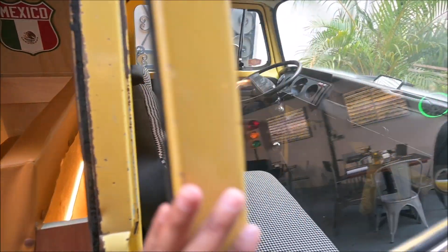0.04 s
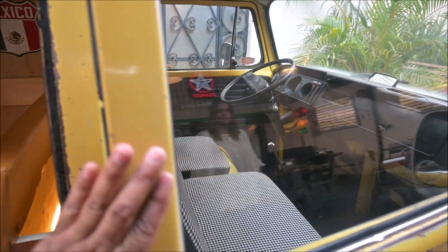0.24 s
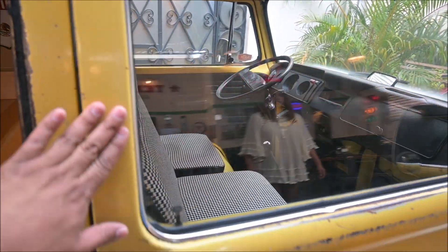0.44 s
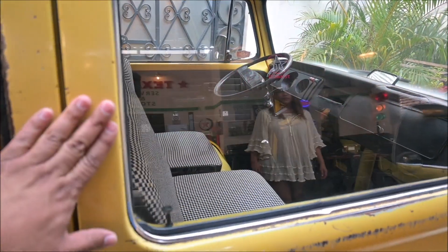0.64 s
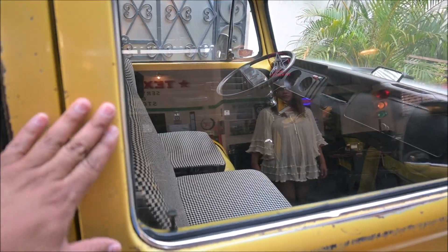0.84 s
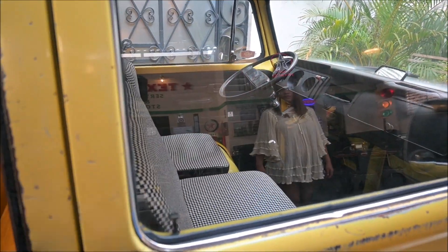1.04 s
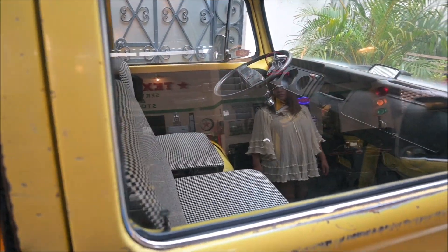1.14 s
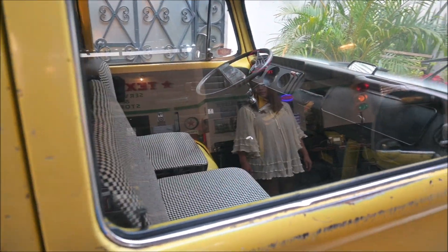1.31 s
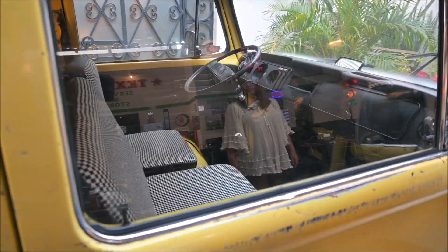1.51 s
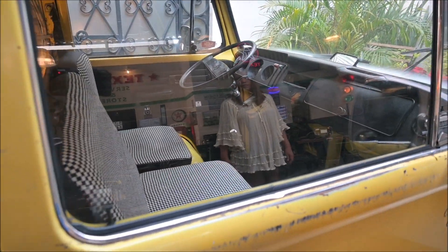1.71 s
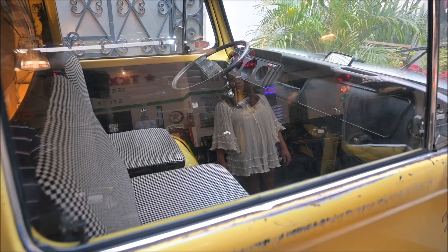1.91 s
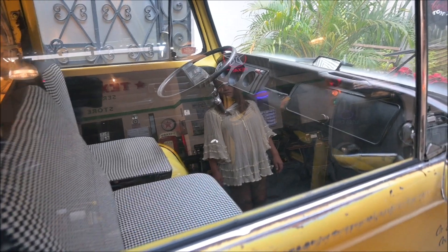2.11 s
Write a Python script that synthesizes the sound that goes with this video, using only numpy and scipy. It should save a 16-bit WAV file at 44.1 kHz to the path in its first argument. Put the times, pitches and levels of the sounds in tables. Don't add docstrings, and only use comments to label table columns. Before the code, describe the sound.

A van door slams once, heard close in a large hard-walled hall. Low, patchy room hum starts alone; from about 0.35 seconds the edge softly brushes the rubber seal. At 0.52 the latch cracks and chatters, and the thin metal panel lands with a hollow boom until about 0.7. The echo fades over the next second, leaving distant drones, faint hiss and a barely audible airy whistle near 1.4.

```python
import sys
import numpy as np
from scipy import signal
from scipy.io import wavfile

SR = 44100
rng = np.random.default_rng(int(sys.argv[2]) if len(sys.argv) > 2 else 0)


def volts_from_db(level):
    exponent = np.asarray(level, float) / 20
    return 10 ** exponent


def generate_wav(signal):
    frames = np.transpose(np.atleast_2d(signal))
    scaled = np.clip(frames, -1, 1) * 32767
    pcm = np.round(scaled).astype(np.int16)
    wavfile.write(sys.argv[1], SR, pcm)


N = 95079

# start in seconds, level in dB, chatter length in seconds.
LATCH_CONTACTS = [
    (.5152, -13.5, 0.0051),
    (.5235, -20, .007),
    (.5325, -20, 0.0069),
    (.520, -24.5, 0.089),
    (.549, -35, 0.012),
    (.564, -26, 0.0037),
    (.576, -30, 0.0094),
    (.587, -26, 0.013),
]
# pitch in Hz, level in dB, 60 dB decay time in seconds.
LATCH_MODES = [(1346, -9.5, 0.021), (1530, -10, .03), (2030, -8.5, 0.038), (2366, -0.5, 0.01),
               (2644, -5, 0.019), (2910, -2.5, 0.02), (3103, -1, 0.015), (3260, -9, 0.018),
               (3386, 0.5, 0.0083), (3600, -2, 0.0075), (4320, 0, 0.0042), (5650, -4, 0.0059),
               (7106, -24.5, .01), (7967, -20, .01)]
# start in seconds, level in dB, length in seconds.
PLATE_STRIKES = [
    (.5155, -18, 0.0069),
    (.5184, -19.5, 0.0046),
    (.534, -19, 0.0034),
]
# start in seconds, level in dB, length in seconds.
PANEL_LANDINGS = [
    (.517, -21.5, 0.0063),
    (.530, -13, 0.017),
    (.542, -13.5, 0.031),
    (.575, -15.5, 0.029),
    (.592, -17.5, 0.024),
    (.612, -14.5, 0.021),
    (.640, -16, 0.045),
]
# pitch in Hz, level in dB, 60 dB decay time in seconds.
PANEL_MODES = [(156, -11.5, 0.094), (197.4, -7, 0.072), (221.5, -0.5, 0.23), (271, -2.5, 0.26),
               (347.3, -2.5, 0.11), (412.6, -8, 0.25), (519, -14, 0.04), (637.4, -6.5, .1),
               (715, 4.5, 0.17), (816, -7.5, 0.11), (797, -24, 0.12), (923, -10, 0.093), (1123, -8, 0.1),
               (1202, -27, .08)]
# start in seconds, level in dB.
SEATING_PUSHES = [
    (0.546, -38.5),
    (.579, -37),
    (.597, -32),
    (.618, -31),
    (.647, -39),
]
# pitch in Hz, level in dB, 60 dB decay time in seconds.
HOLLOW_MODES = [(160.4, -5.5, 0.48), (206.6, -9, 0.22), (233.4, 0.5, 0.24), (272.2, -0.5, 0.6),
                (333.2, -4, 0.34), (722, 7, 0.088)]
# start in seconds, level in dB, length in seconds, centre in Hz.
SCUFFS = [
    (.418, -62.5, 0.0062, 4000),
    (.454, -64, .009, 3600),
    (.497, -54.5, 0.0072, 3000),
    (.503, -39.5, .010, 1850),
    (0.504, -55.5, .008, 6200),
    (.903, -67, 0.0084, 11000),
]
# time in seconds, level in dB.
BRUSH_LEVEL = [
    (.33, -70.5),
    (.385, -65.5),
    (.43, -60),
    (.46, -63),
    (.50, -61),
    (.52, -50),
    (.56, -82),
]
# frequency in Hz, 60 dB decay time in seconds.
HALL_DECAY = [(60, 0.71), (170, 0.18), (350, 1.62), (700, 0.9), (1500, 0.8), (3000, 0.66), (6000, 0.54),
              (12000, 0.39)]
# time in seconds, level in dB.
TONE_BEFORE = [
    [(0.0, -51.5), (0.07, -54.5), (0.236, -52.5), (0.48, -49.5)],
]
# time in seconds, level in dB.
TONE_AFTER = [
    [(1.25, -47.5), (1.342, -49), (1.68, -53.5), (1.702, -48.5), (1.732, -51), (2.15, -47.5)],
]
# frequency in Hz, level in dB per Hz.
TONE_SPECTRUM = [(18, -51.5), (30, -22.5), (87, -6.5), (234, -6), (272, -4.5), (409, -4.5), (883, -7.5),
                 (1830, -28), (5000, -43.5), (6500, -68), (11000, -120)]
# centre in Hz, width in Hz, level in dB.
DRONE_BANDS = [
    (98.6, 15, -62.5),
    (226.6, 42, -61),
    (416.4, 36, -62.5),
]
# start in seconds, level in dB, length in seconds.
WHISTLE_SWELL = [
    (1.31, -71, 0.35),
]

CHATTER_PER_S, CHATTER_SPREAD_DB = 6000, 3


def in_time(rows):
    s, db = np.transpose(rows)
    return np.interp(np.arange(N) / SR, s, db)


def at_hz(points, hz):
    point_hz, value = np.transpose(points)
    return np.interp(np.log(hz), np.log(point_hz), value)


def rms_one(x):
    return x / np.sqrt(np.mean(x ** 2) + 1e-20)


def band(x, low_hz, high_hz):
    edges = [low_hz, min(high_hz, .45 * SR)]
    return signal.sosfilt(signal.butter(2, edges, "band", fs=SR, output="sos"), x)


def noise_band(low_hz, high_hz):
    return rms_one(band(rng.standard_normal(N), low_hz, high_hz))


def drift(rate):
    pole = np.exp(-80 * np.pi * rate / SR)
    white = rng.standard_normal(N // 40 + 2002)
    slow = signal.lfilter([1], [1, -2 * pole, pole * pole], white)[2000:]
    return np.interp(np.arange(N) / 40, np.arange(len(slow)), rms_one(slow))


def ring(force, hz, t60):
    decay = volts_from_db(-60 / (max(t60, .003) * SR))
    w = 2 * np.pi * hz / SR
    return signal.lfilter([0, np.sin(w)], [1, -2 * decay * np.cos(w), decay * decay], force + 1e-18)


def bursts(hits):
    t = np.arange(N) / SR
    out = 0
    for s, db, length in hits:
        u = np.maximum(t - s, 0) / length
        out = out + volts_from_db(db) * (1 - np.exp(-u * 2.9)) * np.exp(-u * u)
    return out


def clicks(per_s):
    size = volts_from_db(CHATTER_SPREAD_DB * np.minimum(rng.exponential(1, N), 4))
    size = size * rng.choice([-1, 1], N)
    return rms_one(size * (rng.random(N) < per_s / SR))


def struck(force, modes, shared):
    out = 0
    for hz, db, t60 in modes:
        own = force * rng.standard_normal(N) * .7
        out = out + volts_from_db(db) * ring(shared + own, hz, t60)
    return out


def latch():
    force = bursts(LATCH_CONTACTS)
    contacts = force * clicks(CHATTER_PER_S)
    crack = band(contacts + force * rng.standard_normal(N), 487, 5860)
    return volts_from_db(-25.5) * struck(force, LATCH_MODES, contacts) + volts_from_db(-1.5) * crack


def strike():
    centre_hz, width_hz = 3130, 940
    plate = band(clicks(CHATTER_PER_S), centre_hz - width_hz / 2, centre_hz + width_hz / 2)
    return bursts(PLATE_STRIKES) * rms_one(plate)


def panel():
    force = bursts(PANEL_LANDINGS)
    skin = struck(force, PANEL_MODES, force * clicks(1200))
    thud = band(force * rng.standard_normal(N), 142, 1390)
    return volts_from_db(-44.5) * skin + volts_from_db(6) * thud


def boom():
    push = np.zeros(N)
    for s, db in SEATING_PUSHES:
        push[int(s * SR)] = volts_from_db(db)
    hollow = sum(volts_from_db(db) * ring(push, hz, t60) for hz, db, t60 in HOLLOW_MODES)
    return hollow + volts_from_db(33.5) * band(push, 158, 880)


def seal():
    scuffs = 0
    for s, db, length, hz in SCUFFS:
        side_hz = .14 * hz
        scuffs = scuffs + bursts([(s, db, length)]) * noise_band(hz - side_hz, hz + side_hz)
    rubbing = rms_one(band(clicks(2980), 696, 2300))
    return scuffs + rubbing * volts_from_db(in_time(BRUSH_LEVEL) + 3.7 * drift(30))


def puff():
    return bursts([(.53, -49.5, .14)]) * noise_band(36, 75)


def hall(x):
    level_db, build_s = -9.5, .02
    t = np.arange(int(1.6 * SR)) / SR
    edges = 45 * 2 ** np.arange(0, 8.8, .3)
    white = rng.standard_normal((2, len(t)))
    echo = 0
    for k, (low, high) in enumerate(zip(edges, edges[1:])):
        t60 = at_hz(HALL_DECAY, np.sqrt(low * high))
        echo = echo + band(white[k % 2], low, high) * volts_from_db(-60 * t / t60)
    echo = echo * (1 - np.exp(-t / build_s))
    return volts_from_db(level_db) * signal.fftconvolve(x, echo / np.sqrt(np.sum(echo ** 2)))[:N]


def room_tone():
    patchy_db = 2.0
    together = drift(3)
    edges = 25 * 2 ** np.arange(0, 8, 1 / 3)
    white = rng.standard_normal((2, N + 4000))
    out = 0
    for k, (low, high) in enumerate(zip(edges, edges[1:])):
        gain_db = at_hz(TONE_SPECTRUM, np.sqrt(low * high))
        gain_db = gain_db + patchy_db * (0.2 * together + drift(27.0))
        out = out + band(white[k % 2], low, high)[4000:] * volts_from_db(gain_db)
    return rms_one(out) * volts_from_db(0.5 + in_time(TONE_BEFORE[0] + TONE_AFTER[0]))


def drones():
    out = 0
    for hz, width, db in DRONE_BANDS:
        level = volts_from_db(db + 2.33 * drift(2.9))
        out = out + level * noise_band(hz - width / 2, hz + width / 2)
    return out


def whistle():
    centre_hz = 3360
    return bursts(WHISTLE_SWELL) * noise_band(centre_hz - 260, centre_hz + 260)


def hiss():
    mid_db, side_db, tilt = -69, -69, 0.067
    white = signal.lfilter([1, -tilt], [1], rng.standard_normal((2, N)))
    mid, side = band(white, 1500, 19160)
    return volts_from_db(mid_db) * mid + volts_from_db(side_db) * side * [[1], [-1]]


def scene():
    port_db, hall_wide_db = -18, -14
    door = latch() + strike() + panel() + boom() + seal()
    echo = hall(door)
    sideways = band(volts_from_db(port_db) * door + volts_from_db(hall_wide_db) * echo, 4000, 12000)
    wide = np.gradient(sideways) * [[1], [-1]]
    return door + echo + wide + puff() + room_tone() + drones() + whistle() + hiss()


def band_limit(x):
    return signal.sosfilt(signal.butter(12, 16660, fs=SR, output="sos"), x)


def record(dry):
    ceiling, cutoff_hz = .28, 15780
    mid = dry.mean(axis=0)
    limited = dry - mid + ceiling * np.tanh(mid / ceiling)
    top_cut = signal.ellip(12, .5, 60, cutoff_hz, fs=SR, output="sos")
    mix = signal.sosfilt(top_cut, limited)
    return band_limit(mix)


dry = scene()
out = record(dry)
generate_wav(out)
```